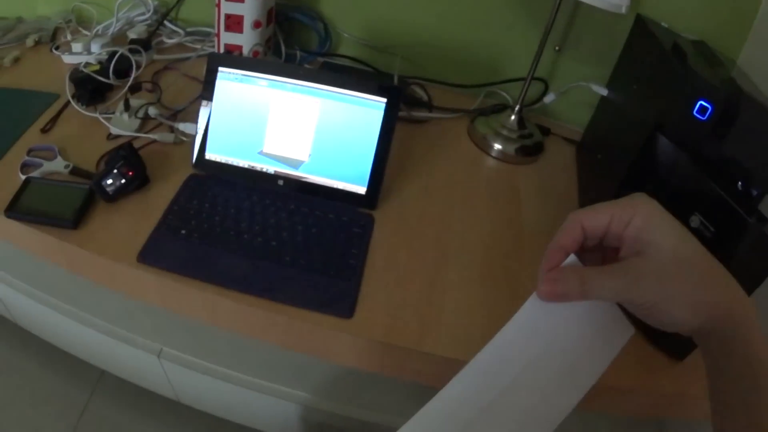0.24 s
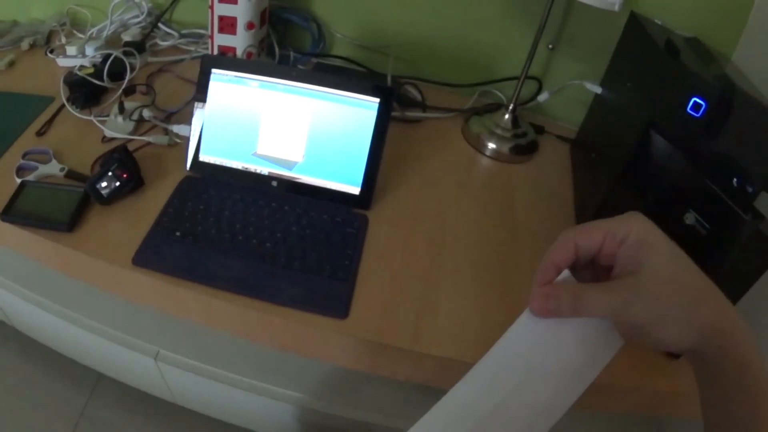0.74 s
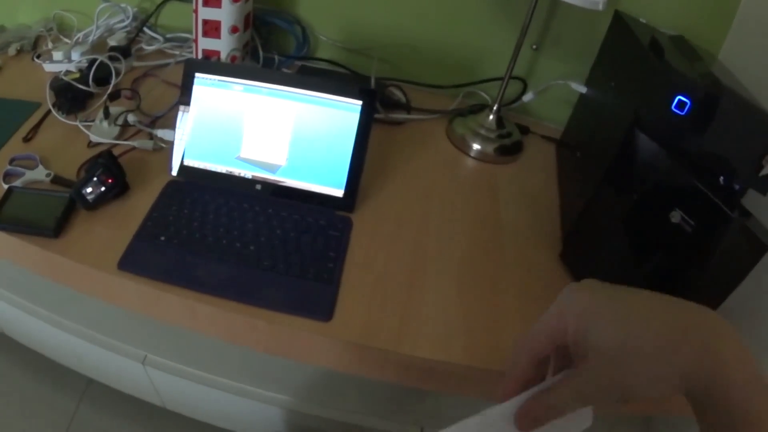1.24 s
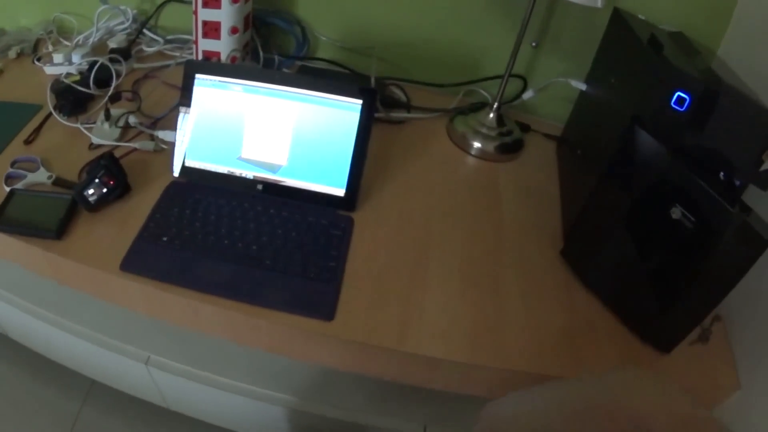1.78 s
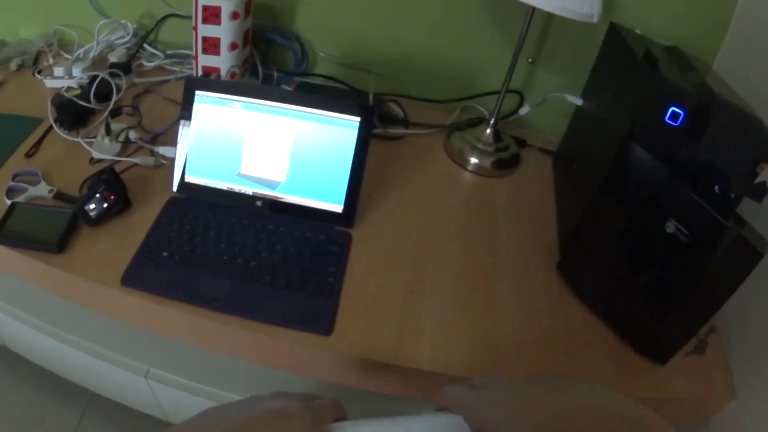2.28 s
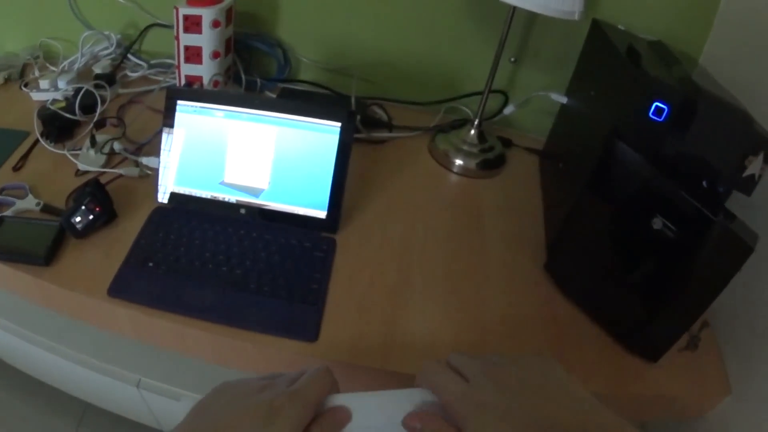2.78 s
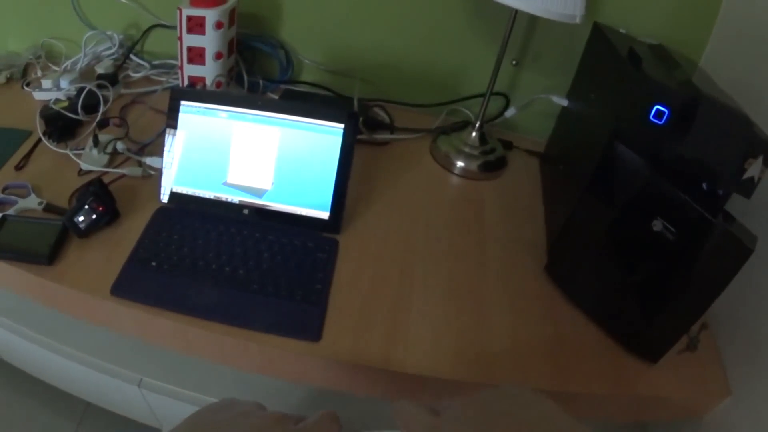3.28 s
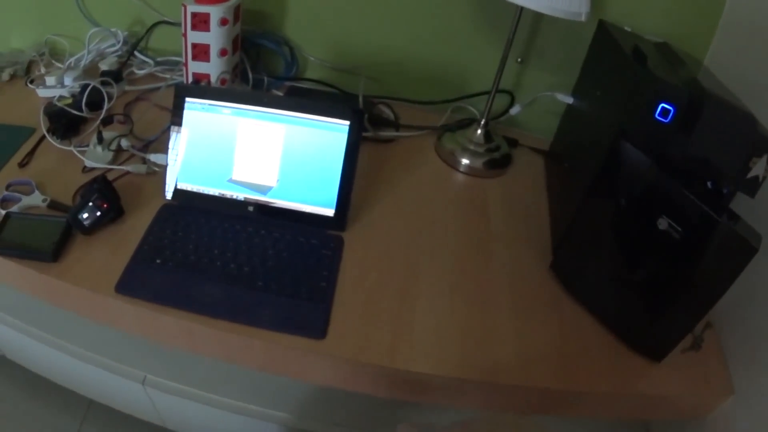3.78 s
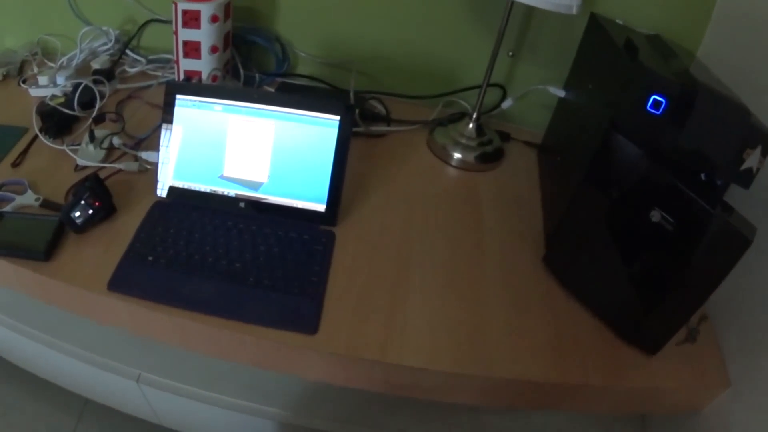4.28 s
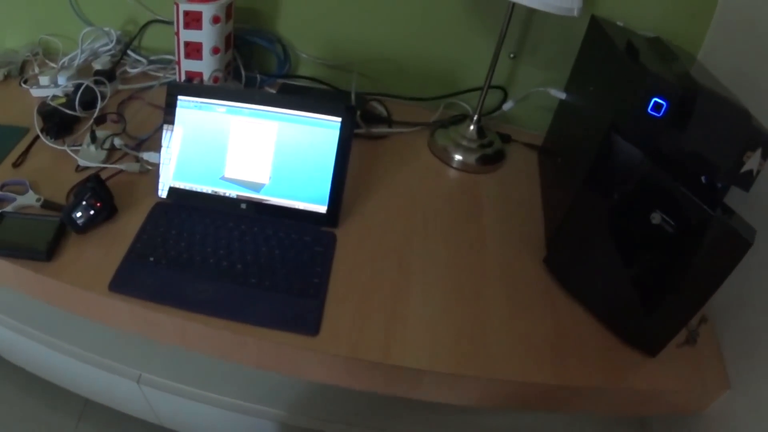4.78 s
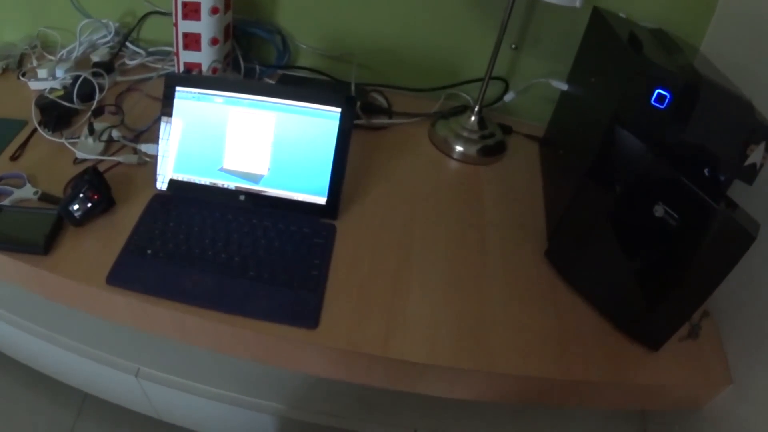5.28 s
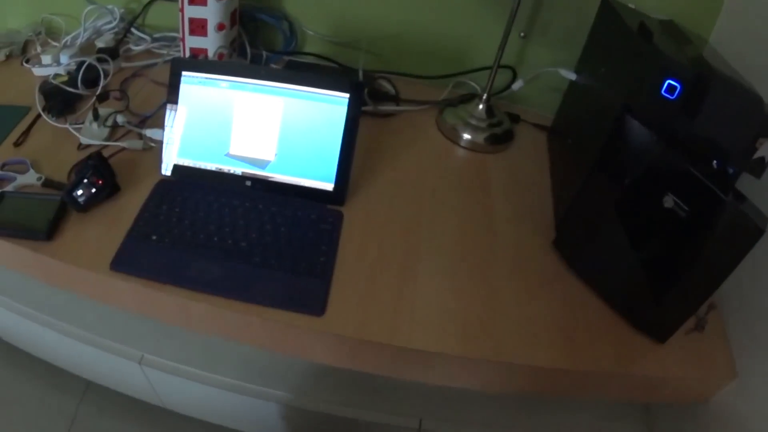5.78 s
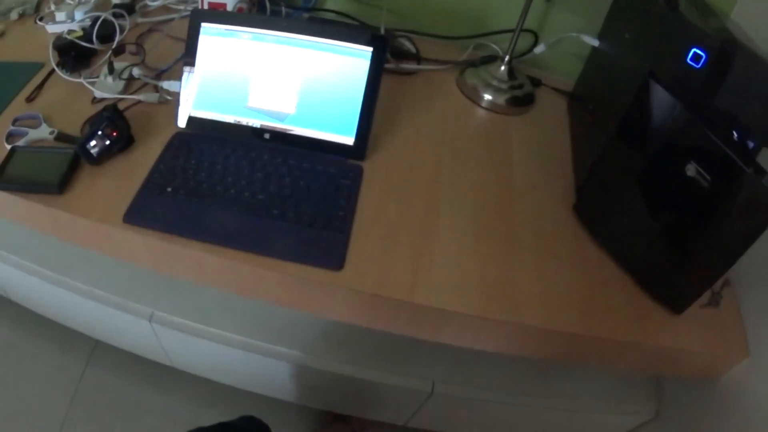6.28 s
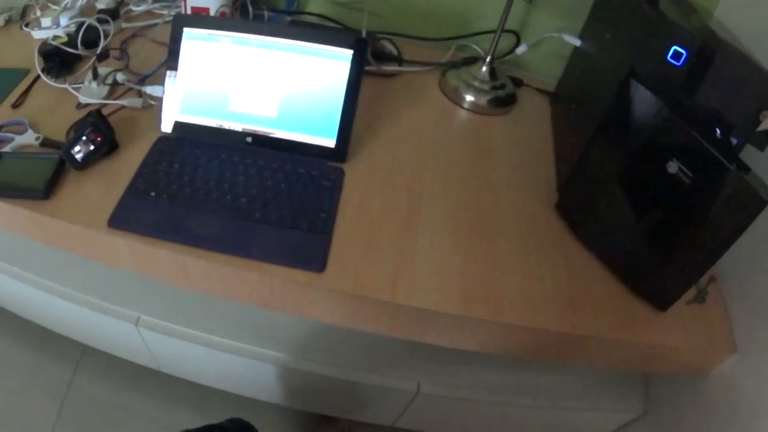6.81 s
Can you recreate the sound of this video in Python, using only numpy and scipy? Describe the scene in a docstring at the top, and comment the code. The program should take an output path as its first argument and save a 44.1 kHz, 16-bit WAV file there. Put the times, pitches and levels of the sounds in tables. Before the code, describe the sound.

Fingers slide along paper creases while the sheet rustles and snaps, a computer fan rushing steadily in a small room.

```python
"""A desk in a small room, the microphone close to a sheet of paper being folded into a fan.
From the start a computer's fans rush steadily behind it, and fingertips hiss along the folds while
the held sheet rustles. At 0.3 s comes the first dry snap: the sheet buckles, the facets beside the
crease ring, and the walls answer faintly. From 0.7 s the paper is also bent over now and then, its
fibres crackling in the tightening crease. Strokes, snaps and bends go on until about 7 s."""
import sys
import numpy as np
from scipy import signal
from scipy.fft import rfft, irfft, next_fast_len
from scipy.io import wavfile
from scipy.ndimage import uniform_filter1d, map_coordinates

SR = 44100
rng = np.random.default_rng(int(sys.argv[2]) if len(sys.argv) > 2 else 0)


def file_out(sig):
    """Save sig as 16-bit WAV at sys.argv[1]."""
    # one column per channel
    cols = np.atleast_2d(sig).T
    # limit, then scale
    lim = np.clip(cols, -1, 1)
    pcm = np.round(lim * 32767).astype(np.int16)
    wavfile.write(sys.argv[1], SR, pcm)


N = 310905


def amp(db):
    """Decibels to gain."""
    return 10 ** (np.asarray(db) / 20)


def unit(x):
    """x scaled to rms 1."""
    return x / np.sqrt(np.mean(x ** 2) + 1e-20)


def along(points, hz):
    """A curve through (Hz, value) points, read at hz on a log axis."""
    point_hz, values = np.transpose(points)
    return np.interp(np.log(hz + 1), np.log(point_hz + 1), values)


def filtered(x, response):
    """x through a gain that depends on frequency."""
    size = next_fast_len(N + SR // 2)
    return irfft(rfft(x, size) * response(np.fft.rfftfreq(size, 1 / SR)), size)[..., :N]


def coloured(x, spectrum):
    """x shaped by (Hz, dB) points, at rms 1."""
    return unit(filtered(x, lambda hz: amp(along(spectrum, hz))))


def stereo(pair, side_db):
    """Left and right from a shared signal and an opposed one."""
    side = amp(side_db) * pair[1]
    return np.array([pair[0] + side, pair[0] - side])


def noise():
    """Two unrelated white noises."""
    return rng.standard_normal((2, N))


def wobble(rate):
    """A smooth random curve, rate knots a second."""
    knots = rng.standard_normal(int(N * rate / SR) + 4)
    return map_coordinates(knots, [np.arange(N) * rate / SR])


def grains(rate, spread_db, t60):
    """Tiny bursts at random moments, most small and a few large."""
    kicks = (rng.random(N) < rate / SR) * amp(spread_db * np.minimum(rng.exponential(size=N), 4))
    t = np.arange(SR // 20) / SR
    power = signal.fftconvolve(kicks ** 2, 10 ** (-6 * t / t60))[:N]
    return unit(np.sqrt(np.abs(power)) * noise())


def drifting(x, depth_db):
    """The colour of x shifts in patches, a few hundred Hz wide and a tenth of a second long."""
    spectra = signal.stft(x, nperseg=512)[2]
    patches = uniform_filter1d(rng.standard_normal(spectra.shape[1:]), size=5, axis=0)
    patches = uniform_filter1d(patches, size=24, axis=1)
    return signal.istft(spectra * amp(depth_db * unit(patches)), nperseg=512)[1][:, :N]


def gesture(start, length, attack, release, swell_db):
    """Gain of one hand movement: it sets in, grows or fades, and lets go."""
    t = np.arange(N) / SR - start
    gate = np.clip(t / attack, 0, 1) * np.clip((length - t) / release, 0, 1)
    return gate * amp(swell_db * (np.clip(t / length, 0, 1) - .5))


# The computer's fan air and its rumble. Each row: frequency in Hz, relative level in dB.
FAN_SPECTRUM = [(160, -33), (280, -17), (320, -3), (460, -1.65), (590, -3.5), (740, 1), (960, -3),
                (1130, -1), (1240, -7), (1480, -5.5), (1850, -11), (2450, -12), (3500, -21), (5800, -24),
                (11000, -26.5)]
RUMBLE_SPECTRUM = [(20, -6), (48, 1.5), (62, -2), (95, -2.5), (150, 1), (300, -20), (600, -21)]
# The air's width at the microphone. Each row: frequency in Hz, rough left-right likeness from 0 to 1.
FAN_LIKENESS = [(60, 0.82), (130, 0.51), (270, 0.98), (580, 0.94), (1230, 0.76), (2600, 0.4), (5540, 0.54),
                (11800, 0.95)]
# The humming case. Each row: resonance in Hz, half width in Hz, level in dB.
CASE_RESONANCES = [(99.4, 3.3, -70.5), (120.5, 9.5, -66.5), (204.3, 15.5, -54.5), (245.2, 21, -53),
                   (311.4, 19.5, -52), (720, 63, -50.5), (872, 6.4, -51)]

def computer():
    """Behind the paper, fan air rushes over a low rumble and the case hums in narrow resonances."""
    def mid_and_side(hz):
        angle = np.arccos(np.clip(along(FAN_LIKENESS, hz), 0, 1)) / 2
        return np.array([np.cos(angle), np.sin(angle)])

    def resonance(centre_hz, width_hz):
        return unit(filtered(noise(), lambda hz: 1 / (1 + ((hz - centre_hz) / width_hz) ** 2)))

    turbulence = stereo(filtered(noise(), mid_and_side), side_db=0.5)
    air = amp(-35.5) * coloured(turbulence, FAN_SPECTRUM)
    rumble = amp(-60) * coloured(stereo(noise(), side_db=-9), RUMBLE_SPECTRUM)
    hum = sum(amp(db) * resonance(hz, width_hz) for hz, width_hz, db in CASE_RESONANCES)
    return air + rumble + stereo(hum, side_db=-17.5)


# Fingers along a fold, close to the microphone. Each row: start in seconds, length in seconds,
# relative level in dB, swell from start to end in dB, rub of flat fingers in dB against the hiss.
FINGER_STROKES = [(0.0, 0.3, -37, 6.5, -14), (0.263, 0.3, -35.5, 0, -13), (0.63, 0.26, -33.5, -5, -12.5),
                  (0.85, 0.18, -45, -4, -6), (1.04, 0.23, -38, 0, -4.5), (1.233, 0.24, -34, 7, -6.5),
                  (1.491, 0.27, -32, -4, -18), (1.796, 0.24, -47.5, -11, -9),
                  (1.957, 0.22, -34.5, -8, -10.5), (2.285, 0.15, -39.5, 3, -7),
                  (2.44, 0.11, -35.5, -4, -7.5), (2.53, 0.15, -38, 3, -8), (2.664, 0.067, -27, 0, -12),
                  (2.734, 0.15, -56, -2, -13), (2.93, 0.17, -42, 10, -15), (3.065, 0.13, -35, 5, -9.5),
                  (3.236, 0.16, -40, -8, -12), (3.362, 0.11, -38, 10, -7), (3.471, 0.073, -31.5, -4, -16),
                  (3.628, 0.19, -38.5, 6, -20), (3.797, 0.25, -41.5, 8, -12), (4.078, 0.16, -40, 1, -16),
                  (4.2, 0.22, -43.5, -10, -3), (4.49, 0.08, -45, 3, -11), (4.598, 0.18, -42, -7, -14),
                  (4.722, 0.256, -37.5, -7, -4), (4.981, 0.09, -37, 0, -5), (5.08, 0.064, -40, 0, -4),
                  (5.166, 0.34, -40.5, 0, -7), (5.398, 0.27, -36.5, 3, -11),
                  (5.64, 0.32, -36, -10.5, -11.5), (5.9, 0.32, -41, 6, -13), (6.204, 0.14, -35.5, -15, -10),
                  (6.295, 0.25, -34.5, 8, -10.5), (6.525, 0.16, -37, 16, -8),
                  (6.646, 0.23, -31.5, -15, -13.5), (6.843, 0.24, -37, 5, -10.5)]
# The bright hiss and the duller rub. Each row: frequency in Hz, relative level in dB.
HISS_SPECTRUM = [(1500, -40), (3000, -37), (4500, -13.5), (6500, -6.5), (8200, -2), (9300, -3.5),
                 (11000, -2.2)]
RUB_SPECTRUM = [(1500, -14), (3500, -6.5), (5000, -0.5), (6500, -3), (8000, -8), (11000, -8)]

def sliding_fingers():
    """Skin on paper hisses, coloured by the sheet's changing curve. Returns sound and stroke gain."""
    def friction(spectrum):
        roughness = noise() + 0.54 * grains(rate=900, spread_db=2, t60=0.004)
        return coloured(drifting(stereo(roughness, side_db=-15), depth_db=1), spectrum)

    stroke_gain, rub_gain = np.zeros((2, N))
    for start, length, db, swell_db, rub_db in FINGER_STROKES:
        move = amp(db) * gesture(start, length, attack=0.047, release=0.045, swell_db=swell_db)
        stroke_gain += move
        rub_gain += amp(rub_db) * move
    hiss = stroke_gain * friction(HISS_SPECTRUM)
    rub = rub_gain * friction(RUB_SPECTRUM)
    flicker_db = 1.14 * wobble(35)
    return amp(1 + flicker_db) * (hiss + rub), stroke_gain


# The lower rustle of the whole sheet. Each row: frequency in Hz, relative level in dB.
FLEX_SPECTRUM = [(100, -12), (200, -11), (400, 0), (1100, 8), (1800, 0), (2400, 0), (3300, -5),
                 (4700, -8.5), (7000, -9.5), (11000, -5.5)]

def flexing_sheet(stroke_gain, bend_gain, held_db=-49.5, drag_db=-15.5):
    """The sheet rustles with small crackles as it is held, dragged by a finger or bent."""
    flex_gain = np.sqrt(amp(held_db) ** 2 + (amp(drag_db) * stroke_gain) ** 2 + bend_gain ** 2)
    crackle = noise() + 0.94 * grains(rate=180, spread_db=4, t60=0.014)
    flicker_db = 0.98 * wobble(14)
    rustle = coloured(drifting(stereo(crackle, side_db=-8), depth_db=4.5), FLEX_SPECTRUM)
    return flex_gain * amp(6 + flicker_db) * rustle


def causal(gain):
    """The minimum-phase impulse response with this gain: it starts at once and then dies."""
    cepstrum = irfft(np.log(np.maximum(gain, 1e-6)))
    half = len(cepstrum) // 2
    fold = np.r_[1, np.full(half - 1, 2), np.zeros(half)]
    return irfft(np.exp(rfft(cepstrum * fold)))


def crease_response(brightness, large_hz, small_hz, low_hz=302, pivot_hz=2000):
    """A tight crease snaps bright, a loose one dull; the facets beside it ring, the larger one lower."""
    hz = np.fft.rfftfreq(2048, 1 / SR) + 1

    def facet(ring_hz, lift_db, half_width_octaves=0.13):
        return (amp(lift_db) - 1) / (1 + (np.log2(hz / ring_hz) / half_width_octaves) ** 2)

    # Paper damps the high ring more, and the sheet radiates little below low_hz.
    rings = 1 + facet(large_hz, lift_db=10.5) + facet(small_hz, lift_db=9)
    reach_hz = 11000 * 2 ** (0.25 * brightness)
    band = 1 / np.sqrt((1 + (low_hz / hz) ** 8) * (1 + (hz / reach_hz) ** 6))
    tilt = amp(brightness * np.log2(hz / pivot_hz))
    return causal(band * tilt * rings)


# The sheet buckles, close to the microphone. Each row: start in seconds, relative level in dB,
# brightness in dB per octave, ring of the larger facet in Hz, of the smaller in Hz, t60 in seconds.
BUCKLES = [(0.3107, -24.5, -2.5, 1180, 4200, 0.028), (0.5221, -30, -4.5, 1250, 2600, 0.019),
           (0.9908, -31.5, -1.5, 1140, 1700, 0.013), (1.0152, -23.5, -5, 1140, 2100, 0.035),
           (1.4355, -19.5, -0.5, 1000, 2460, 0.015), (1.578, -20.5, -1.5, 840, 2300, 0.018),
           (1.6971, -27.5, -2.5, 1490, 2600, 0.024), (1.7405, -22.5, 0, 1190, 2460, 0.01),
           (1.8283, -37, -4, 1400, 2700, 0.012), (1.8523, -34.5, -6, 910, 2700, 0.013),
           (2.0714, -24, -4, 2300, 3650, 0.012), (2.654, -24, 1.5, 2110, 4400, 0.017),
           (2.7421, -23.5, -0.5, 1990, 5540, 0.014), (2.8275, -25, 1.5, 3880, 8600, 0.011),
           (2.9486, -37, 0, 915, 7500, 0.012), (3.3733, -27.5, -1, 1280, 4300, 0.02),
           (4.2387, -20.5, -0.2, 1410, 8100, 0.013), (4.2682, -22, -1.4, 2720, 5260, 0.013),
           (4.2999, -25, -3.5, 382, 3570, 0.0096), (4.638, -35, -4, 1050, 2260, 0.025),
           (4.8187, -19, 0.1, 1040, 6250, 0.027), (4.8494, -18.5, -1, 1080, 4030, 0.017),
           (5.4064, -25, -2.5, 440, 1620, 0.025), (5.4332, -21.5, 0.5, 3150, 8200, 0.0089),
           (5.6598, -27.5, -5, 418, 1460, 0.022), (6.0937, -31.5, -4.5, 517, 1490, 0.011),
           (6.279, -31, -0.7, 1370, 3770, 0.014), (6.465, -32, -4.5, 1470, 2600, 0.021),
           (7.0018, -26.5, -2, 1140, 2700, 0.014)]

def buckling_snaps(gain_db=-11.5, click=2.95, rise_s=0.00075):
    """Each buckle is a sharp release, a brief burst of waves across the sheet and a weaker flutter."""
    track = np.zeros((2, N + SR))
    t = np.arange(SR // 6) / SR

    def waves(t60):
        envelope = (1 - np.exp(-t / rise_s)) * np.exp(-np.log(1000) * t / t60)
        return envelope * rng.standard_normal((2, len(t)))

    flip = round(0.0003 * SR)
    for start, db, brightness, large_hz, small_hz, t60 in BUCKLES:
        burst = stereo(waves(t60), side_db=-14)
        burst += amp(-18) * stereo(waves(t60=0.061), side_db=-13)  # flutter
        # The larger facet flips over and is stopped half a swing later.
        burst[:, flip] += click
        burst[:, flip + round(0.5 * SR / large_hz)] -= 0.3 * click
        response = crease_response(brightness, large_hz, small_hz)
        snap = signal.fftconvolve(burst, response[None], axes=1)[:, :len(t)]
        onset = round(start * SR)
        track[:, onset:onset + len(t)] += amp(db + gain_db) * unit(snap)
    return track[:, :N]


# The small room around the desk. Each row: frequency in Hz, t60 in seconds.
ROOM_DECAY = [(250, 0.97), (1500, 1), (5000, 0.48), (11000, 0.68)]
# The colour of its reflections. Each row: frequency in Hz, gain in dB.
WALL_SPECTRUM = [(400, -2), (1500, 2.5), (3500, -0.5), (5500, 1), (11000, -5)]

def room(x, delay_s=0.006):
    """The walls answer after a few ms; the treble dies first."""
    hz, t, spectra = signal.stft(rng.standard_normal((2, SR // 2)), SR, nperseg=256)
    decay = np.exp(-np.log(1000) * t / along(ROOM_DECAY, hz)[:, None])
    tail = signal.istft(spectra * decay, SR, nperseg=256)[1]
    tail = np.pad(stereo(tail, side_db=-6.5), ((0, 0), (round(delay_s * SR), 0)))
    tail /= np.linalg.norm(tail[0])
    reflections = signal.fftconvolve(x.mean(axis=0)[None], tail, axes=1)[:, :N]
    return filtered(reflections, lambda hz: amp(along(WALL_SPECTRUM, hz)))


# The sheet is bent over and relaxes. Each row: start in seconds, length in seconds,
# relative level in dB, crinkle in dB against that level.
SHEET_BENDS = [(0.66, 0.089, -36, -17), (0.971, 0.15, -41, -23), (1.408, 0.18, -42, -4),
               (1.527, 0.21, -41.5, -15), (2.516, 0.13, -45.5, -12), (4.25, 0.17, -44.5, -3),
               (4.842, 0.17, -40.5, -1), (5.435, 0.22, -41, -7.5), (5.644, 0.27, -52, 1),
               (6.45, 0.073, -47, -12), (6.705, 0.12, -43, -4)]
# The crinkle, heard close up. Each row: frequency in Hz, relative level in dB.
CRINKLE_SPECTRUM = [(800, -29), (1800, -7), (3200, 3), (5500, 0), (8000, -7), (11000, -29)]

def tightening_creases():
    """Fibres give way in quick succession as the sheet is bent. Returns sound and bend gain."""
    bend_gain, crinkle_gain = np.zeros((2, N))
    for start, length, db, crinkle_db in SHEET_BENDS:
        move = amp(db) * gesture(start, length, attack=0.024, release=0.087, swell_db=-6.5)
        bend_gain += move
        crinkle_gain += amp(crinkle_db) * move
    fibres = stereo(grains(rate=1300, spread_db=0.5, t60=0.0055), side_db=-6)
    return crinkle_gain * coloured(fibres, CRINKLE_SPECTRUM), bend_gain


def scene():
    """Paper close to the microphone, the room answering its snaps, the computer behind."""
    snaps = buckling_snaps()
    reflections = amp(-11) * room(snaps)
    slides, stroke_gain = sliding_fingers()
    crinkle, bend_gain = tightening_creases()
    rustle = flexing_sheet(stroke_gain, bend_gain)
    return computer() + slides + rustle + snaps + reflections + crinkle


def record(dry):
    """The treble ends steeply at 11 kHz."""
    return filtered(dry, lambda hz: 1 / np.sqrt(1 + (hz / 11000) ** 240))


dry = scene()
out = record(dry)
file_out(out)
```